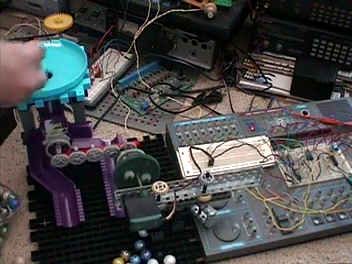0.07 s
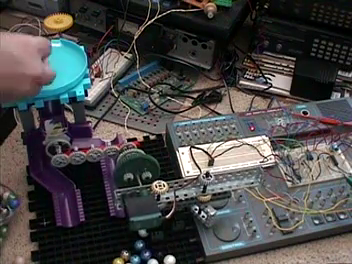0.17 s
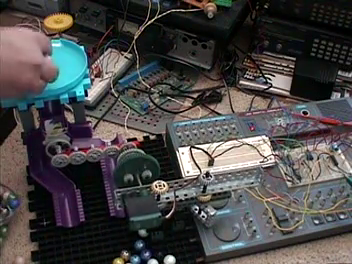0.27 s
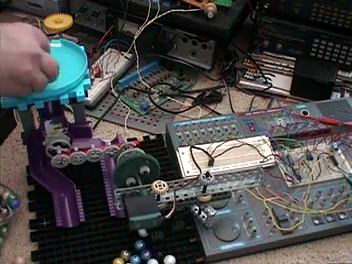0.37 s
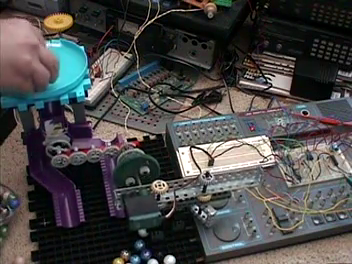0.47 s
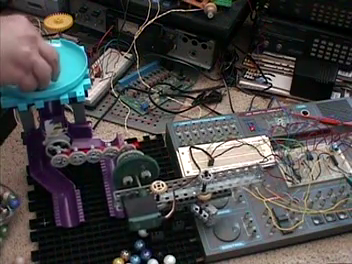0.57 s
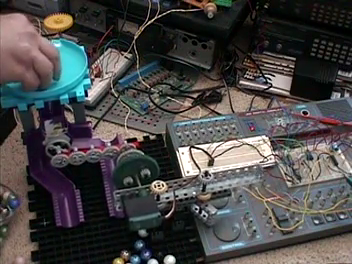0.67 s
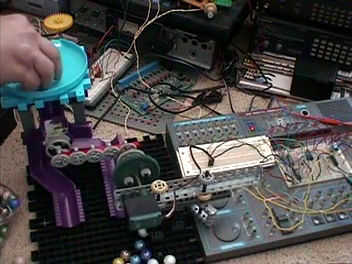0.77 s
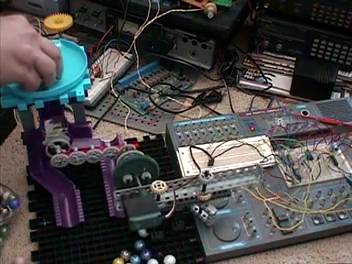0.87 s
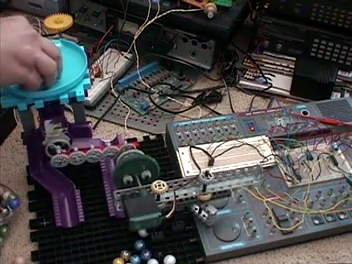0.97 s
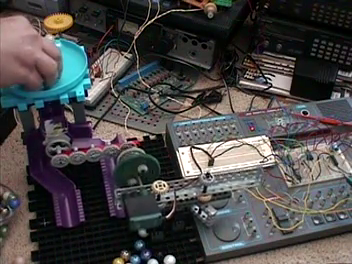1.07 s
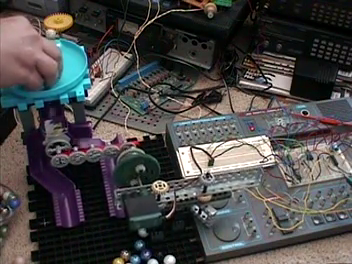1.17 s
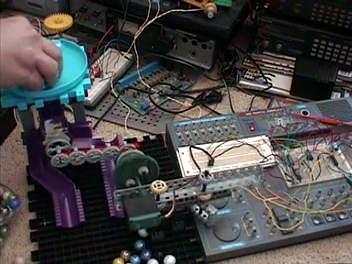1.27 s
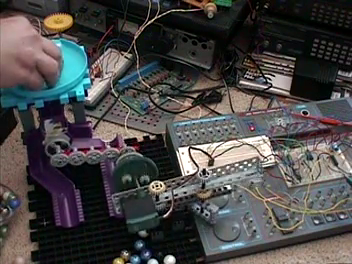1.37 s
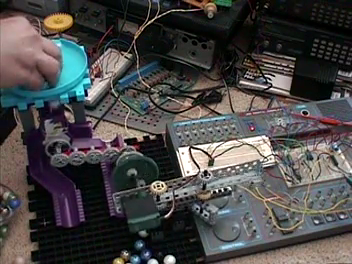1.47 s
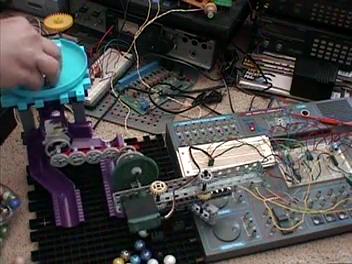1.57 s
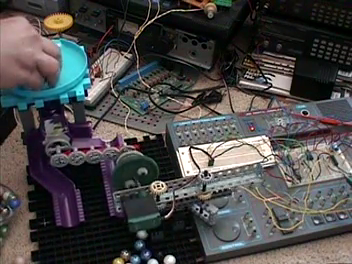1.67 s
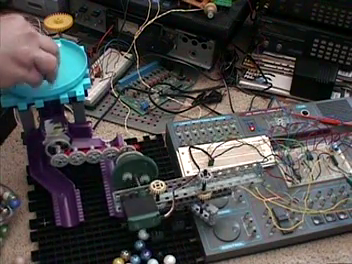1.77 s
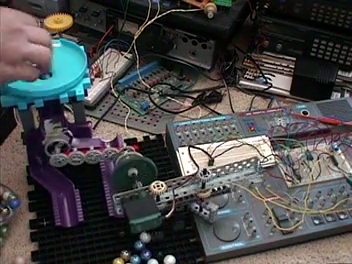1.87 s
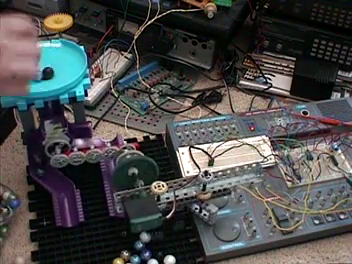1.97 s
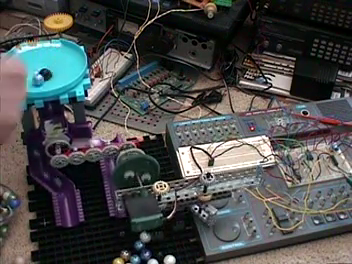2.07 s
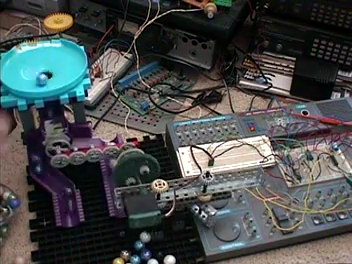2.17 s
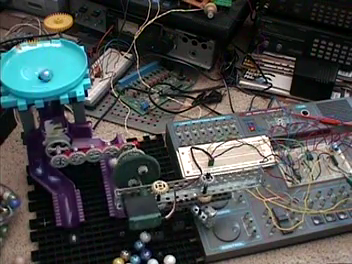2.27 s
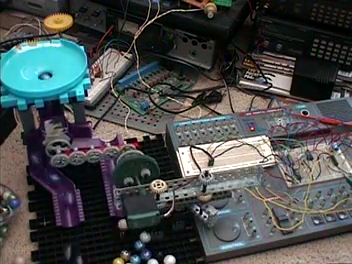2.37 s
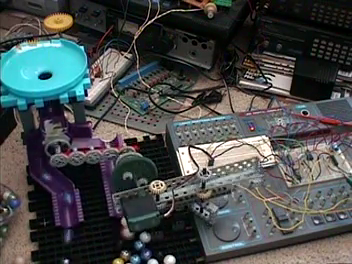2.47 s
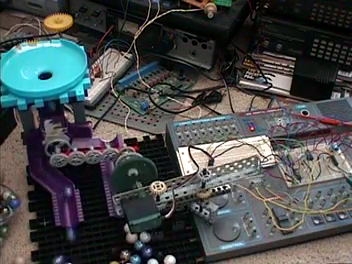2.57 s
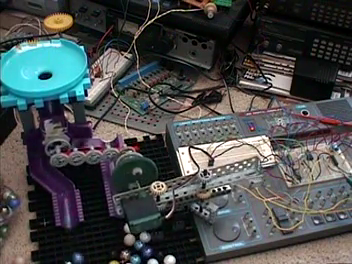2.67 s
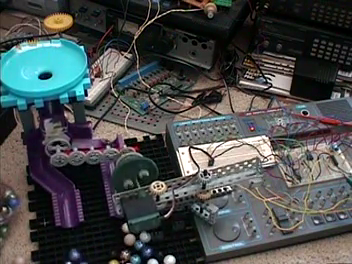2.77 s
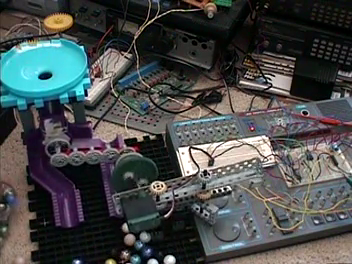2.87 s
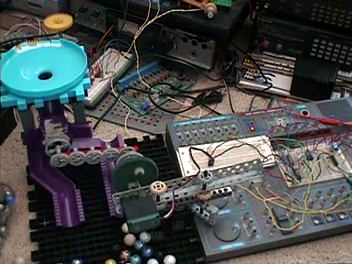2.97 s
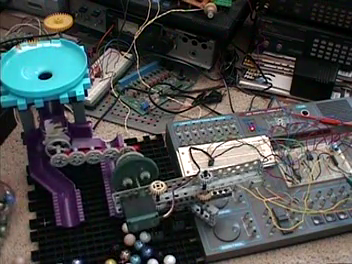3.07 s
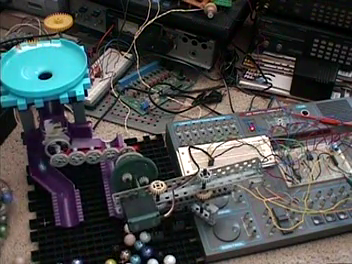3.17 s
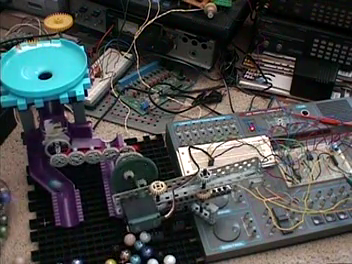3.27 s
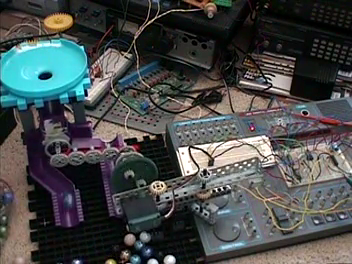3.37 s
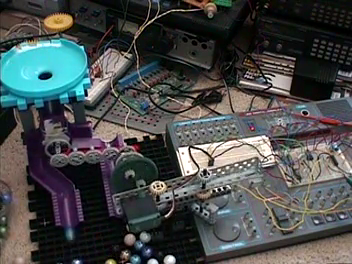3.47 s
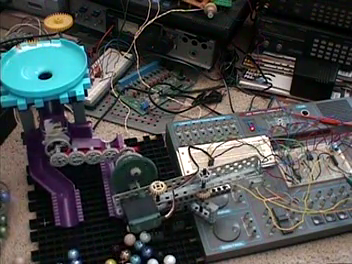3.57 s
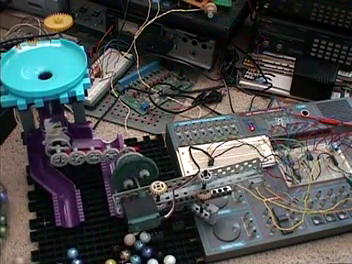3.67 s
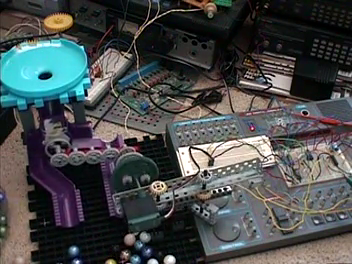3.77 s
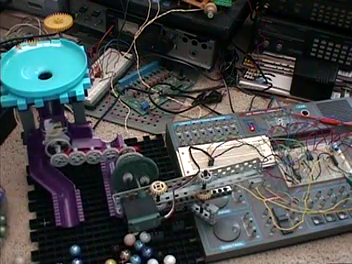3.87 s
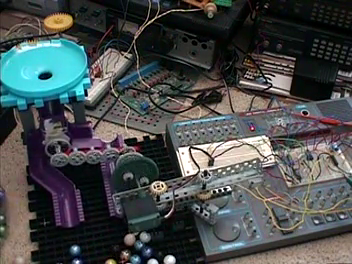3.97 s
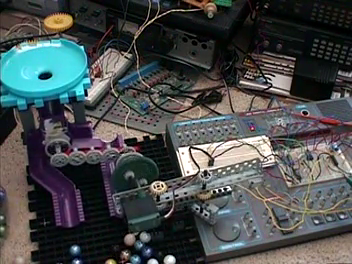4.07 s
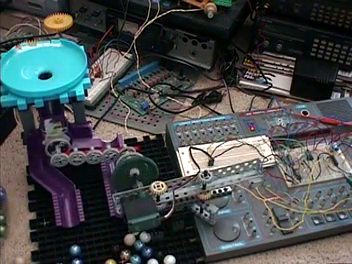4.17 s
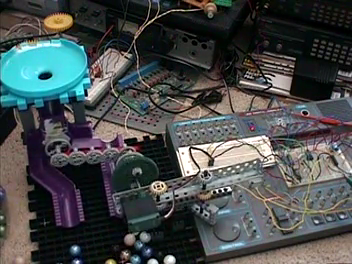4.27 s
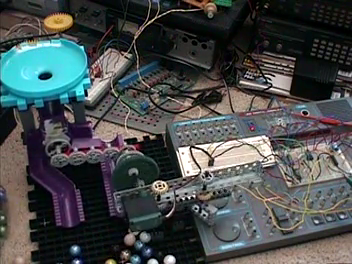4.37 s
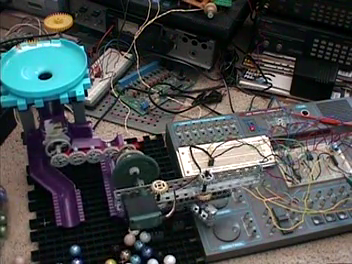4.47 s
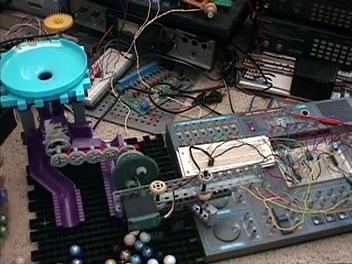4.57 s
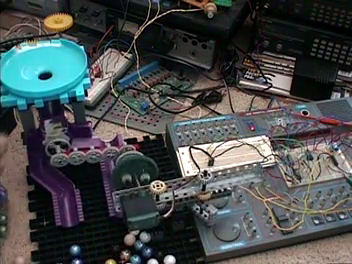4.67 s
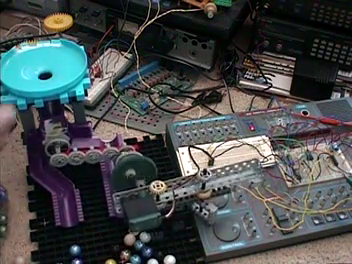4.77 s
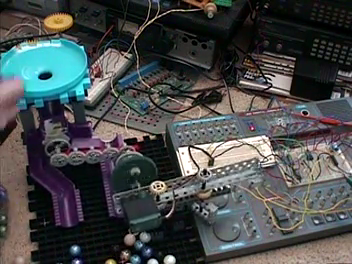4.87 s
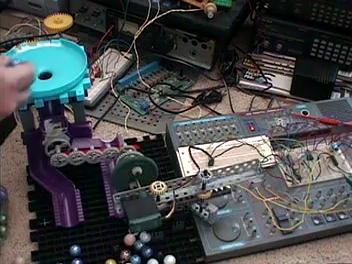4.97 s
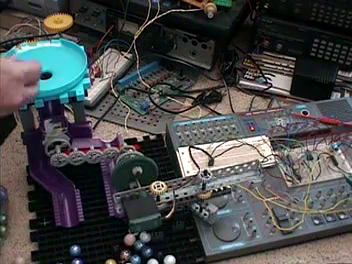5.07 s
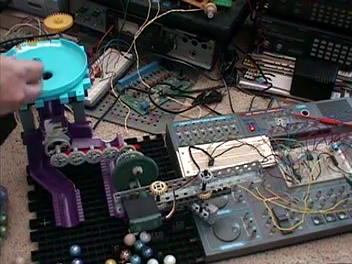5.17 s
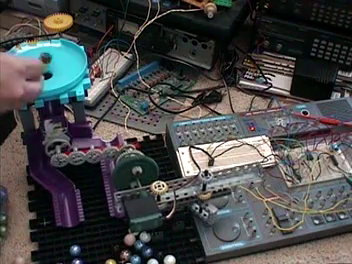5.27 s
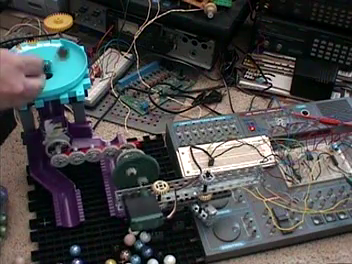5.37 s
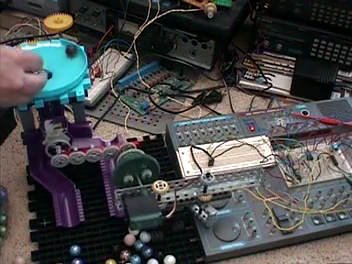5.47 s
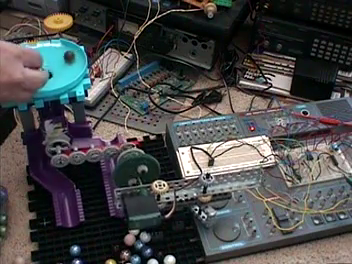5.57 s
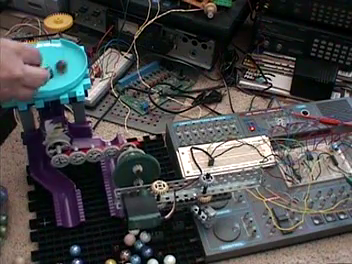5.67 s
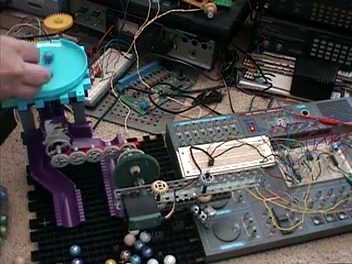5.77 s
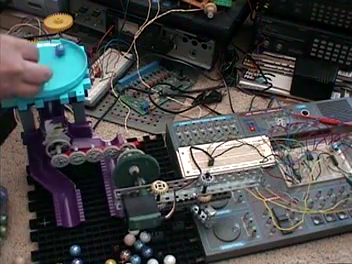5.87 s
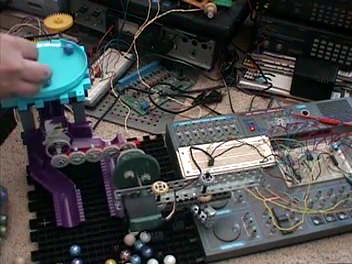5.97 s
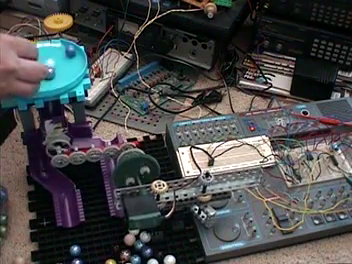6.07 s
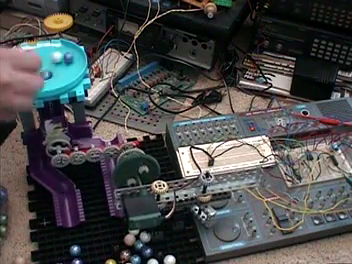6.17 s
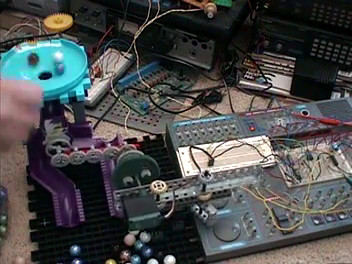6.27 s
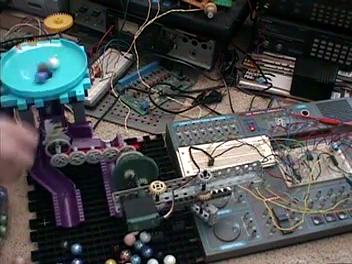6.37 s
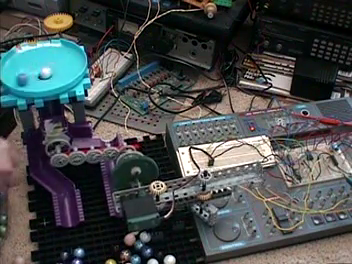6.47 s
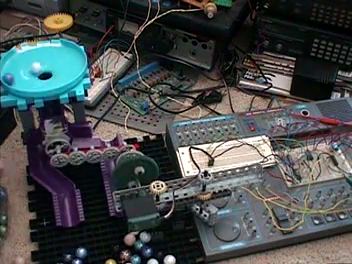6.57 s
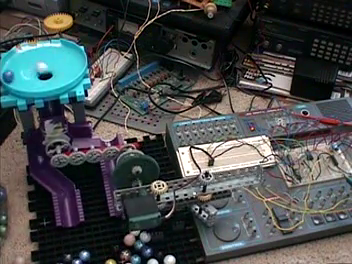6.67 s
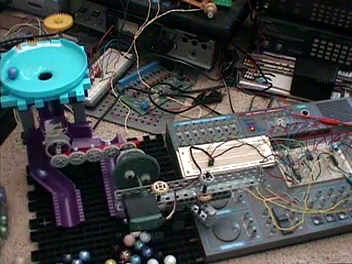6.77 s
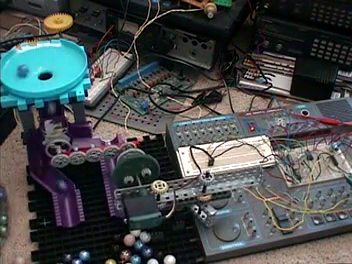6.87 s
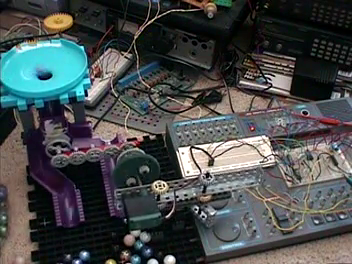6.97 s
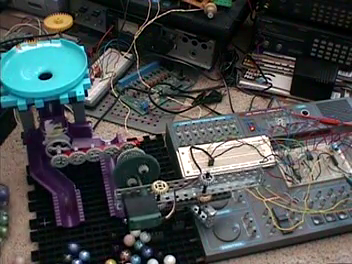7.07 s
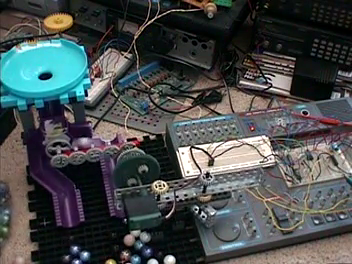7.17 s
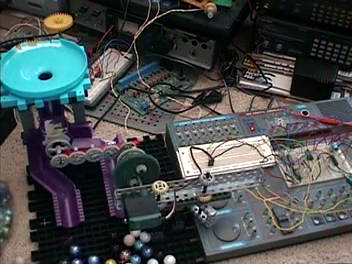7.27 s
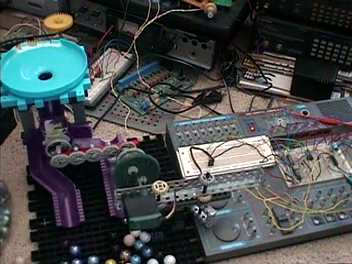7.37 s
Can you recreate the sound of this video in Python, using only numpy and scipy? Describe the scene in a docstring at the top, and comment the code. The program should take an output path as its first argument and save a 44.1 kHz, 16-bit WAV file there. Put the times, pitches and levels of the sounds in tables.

```python
"""Glass marbles knock and roll round a ringing plastic funnel, clatter down tracks and rumble over a base plate.
Under them a small gear motor whirs, dips when its gears bind and whines now and then, in a small room.
Knocks are short noise bursts sent through resonances; rolling is a dense patter of tiny impacts.
The motor is filtered noise with a wavering tone; the whines and a few soft slides are gliding sine tones."""
import sys
import numpy as np
from scipy import signal
from scipy.fft import rfft, irfft
from scipy.io import wavfile

SR = 44100
rng = np.random.default_rng(int(sys.argv[2]) if len(sys.argv) > 2 else 0)


def wav_out(sig):
    """Save sig, one row per channel (or a flat mono array), as 16-bit PCM at SR to the path in sys.argv[1]."""
    wavfile.write(sys.argv[1], SR, np.round(np.clip(np.atleast_2d(sig).T, -1, 1) * 32767).astype(np.int16))


N = 327222
TIME = np.arange(N) / SR  # seconds
EDGE_HZ = 12650  # top of the sound band
MOTOR_DB = -43  # whir of the freely running gears, before its flutter

# Levels in these tables are relative: the functions below trim and shape them further.
# Where the marbles are. Each row: time in seconds, share in the funnel from 0 to 1 (the rest is on the tracks).
FUNNEL_SHARE = [(.4, 0), (.55, 1), (1.82, 0.8), (1.9, 0), (5.2, 0.3), (5.28, 0.97), (6.14, 0.99),
                (6.25, 0.1), (6.9, 0.4), (7.05, 0.95), (7.13, 0)]
# Ringing notes of the funnel. Each row: pitch in Hz, width in Hz, level in dB.
FUNNEL_NOTES = [(213, 13, -27), (519, 26, -16), (846, 45, -16), (1124, 44, 0), (1210, 39, -4),
                (1316, 76, -6), (1560, 50, -11), (1936, 89, -7.5)]
# Ringing notes of the tracks. Each row: pitch in Hz, width in Hz, level in dB.
TRACK_NOTES = [(219, 9.5, 0), (318, 47, -11), (440, 110, -8), (832, 140, 8.5), (1065, 150, 9),
               (1244, 82, 5.5), (1444, 93, 10.5), (1930, 520, 7)]
# Ringing notes of the base plate. Each row: pitch in Hz, width in Hz, level in dB.
PLATE_NOTES = [(209, 7.4, -0.5), (239, 30, -0.5)]
# Colour of the thud of the base. Each row: frequency in Hz, level in dB per Hz.
THUD_COLOUR = [(70, -4.5), (150, -22), (220, -10), (290, -10), (520, 6.5), (700, 0), (1500, -11.5)]
# Colour of the bright clack. Each row: frequency in Hz, level in dB per Hz.
CLACK_COLOUR = [(300, -66.5), (800, -19), (1500, -4.5), (2100, 0), (2750, 2.5), (3400, 1.5), (4000, 2.5),
                (5300, -0.5), (6300, -4), (8500, -8.5), (12500, -19.5)]
# Colour of the motor whir. Each row: frequency in Hz, level in dB per Hz.
WHIR_COLOUR = [(200, -19.5), (800, -18), (2000, -22), (2700, -10.5), (3900, -10.5), (4500, -6), (4950, 2),
               (5400, 0), (6400, -9.5), (7000, -2.5), (7500, -7), (10700, -9.5), (12500, -14.5)]
# Colour of the quiet room. Each row: frequency in Hz, level in dB per Hz.
ROOM_COLOUR = [(190, 0), (280, 7), (700, -0.5), (12000, -49)]
# How long echoes last. Each row: frequency in Hz, time to fade by 60 dB in seconds.
ECHO_TIMES = [(150, 0.47), (12000, 0.16)]
# How alike left and right are. Each row: frequency in Hz, correlation (1 is identical).
SIDE_LIKENESS = [(60, 0.091), (1300, 0.91), (2800, 0.72), (6000, 0.041), (12000, 0.18)]
# How much louder left is. Each row: frequency in Hz, left minus right in dB.
SIDE_BALANCE = [(60, 1.5), (300, 7), (660, 3), (1200, 5.5), (2500, 2), (8000, 7), (12000, 0.5)]
# How far left runs ahead. Each row: frequency in Hz, lead in radians.
SIDE_LEAD = [(1500, 0.073), (3900, 0.68), (6600, 0.15)]
# The gears bind and pull free. Each row: quietest moment in seconds, sinking time in seconds,
# recovery time in seconds, depth of the dip in dB.
GEAR_STALLS = [(0.29, 0.14, 0.18, 15), (0.47, 0.059, 0.14, 11.5), (0.66, 0.051, 0.47, 4.5),
               (2.35, 0.12, 0.031, 25), (3.37, 0.21, 0.27, 14.5), (4.071, 0.29, 0.12, 22.5),
               (4.321, 0.14, 0.14, 13.5), (4.47, 0.065, 0.24, 8), (5.04, 0.13, 0.55, 17.5),
               (6.21, 0.037, 0.045, 28), (6.59, 0.053, 0.23, 19), (7.12, 0.12, 0.019, 25)]
# Two low hums and a squeak. Each row: start in seconds, length in seconds, first pitch in Hz,
# last pitch in Hz, level in dB.
SLIDING_TONES = [(0.031, 0.2, 114, 93, -62.5), (0.335, 0.037, 1190, 1850, -56.5),
                 (0.399, 0.5, 97.5, 83.7, -55.5)]
# A rolling marble bumps a wall or a neighbour. Each row: time in seconds, clack level in dB,
# level of the plastic's ring in dB.
MARBLE_BUMPS = [(0.126, -66, -44.5), (0.178, -53, -48), (0.282, -56, -51), (0.587, -30.5, -43),
                (0.718, -24, -26), (0.783, -35, -29.5), (0.8048, -27.5, -29), (0.914, -24, -30),
                (0.977, -28, -25.5), (1.016, -33, -26.5), (1.0847, -26.5, -34), (1.149, -29.5, -33.5),
                (1.1805, -40, -25), (1.1858, -26.5, -31), (1.245, -26.5, -23.5), (1.427, -23.5, -42),
                (1.707, -34, -28.5), (1.9125, -19.5, -30), (1.972, -24, -40), (2.005, -24.5, -40),
                (2.151, -31, -43), (2.281, -22.5, -34), (2.297, -29, -35), (2.314, -25, -40),
                (2.477, -23, -35), (2.6444, -30, -30.5), (2.7311, -25, -45), (2.751, -30, -27),
                (3.252, -29.5, -59), (3.275, -34, -29), (3.4531, -29, -37), (3.5252, -40, -32.5),
                (3.573, -39, -40), (3.602, -39, -33), (3.679, -40, -36.5), (3.8608, -51, -38.5),
                (3.897, -48, -39.5), (3.968, -48, -44.5), (4.0698, -70, -45.5), (4.43, -47, -41.5),
                (4.62, -66, -44.5), (4.9495, -44, -44), (5.133, -51, -48), (5.1505, -43, -49),
                (5.253, -21.5, -30.5), (5.34, -25.5, -24), (5.3598, -29, -33), (5.389, -30.5, -26.5),
                (5.4271, -35, -32), (5.452, -41, -34), (5.6336, -32, -29.5), (5.753, -28.5, -20.5),
                (5.765, -48, -33), (5.793, -23.5, -48), (5.85, -25, -26), (5.999, -23.5, -31),
                (6.0132, -27, -28), (6.085, -27, -21), (6.125, -30, -25), (6.4606, -31, -24),
                (6.708, -23, -29.5), (6.851, -22.5, -40), (6.9947, -25.5, -43.5), (7.058, -34.5, -30),
                (7.078, -34, -28.5), (7.1369, -27, -38), (7.228, -37, -30), (7.264, -29.5, -36)]
# A marble falls and lands. Each row: time in seconds, clack level in dB, brightness of the clack as a
# centre in Hz, note of the struck spot in Hz, level of the plastic's ring in dB.
MARBLE_DROPS = [(0.5421, -22.5, 3900, 3020, -38), (0.8892, -24.5, 4420, 2890, -25.5),
                (0.9302, -20, 3720, 4200, -24.5), (1.1266, -20.5, 3780, 2140, -23.5),
                (1.2246, -19.5, 3800, 1930, -24.5), (1.3506, -17.5, 3320, 3850, -23),
                (1.385, -17.5, 3370, 3750, -36), (1.5542, -17, 3580, 3760, -28.5),
                (1.5788, -19.5, 3380, 5430, -26), (1.7711, -15.5, 3480, 2120, -23),
                (1.8865, -16.5, 2800, 2470, -29.5), (1.9425, -19.5, 3380, 4100, -30),
                (1.989, -18, 3500, 6960, -27), (2.04, -17, 2900, 2460, -30.5),
                (2.1022, -18.5, 3400, 3930, -38), (2.1355, -18, 2970, 2900, -27.5),
                (2.1762, -17.5, 3020, 2530, -31), (2.2166, -19, 3420, 3070, -30),
                (2.2675, -20, 3280, 4260, -33), (2.3869, -15, 2770, 2430, -30),
                (2.4665, -21, 3170, 2620, -34.5), (2.5056, -20.5, 3270, 3920, -29.5),
                (2.685, -20.5, 4100, 5100, -24.5), (2.864, -19, 3470, 3830, -35),
                (3.1487, -19, 2870, 2520, -35), (3.1709, -17, 3300, 7560, -25.5),
                (5.184, -18.5, 3580, 5440, -30), (5.2822, -20.5, 3800, 2030, -22),
                (5.538, -20.5, 3700, 2800, -27), (5.6611, -16.5, 3720, 3240, -21.5),
                (5.905, -17, 3680, 3780, -24.5), (5.941, -16, 2830, 2530, -35),
                (6.2267, -21, 4160, 2930, -28), (6.2881, -18.5, 3500, 3840, -30),
                (6.3765, -17, 3070, 3330, -29), (6.5177, -17, 3200, 2010, -27.5),
                (6.6192, -15.5, 2630, 2520, -30.5), (6.6917, -19, 2580, 2940, -29.5),
                (6.8251, -15.5, 2900, 2520, -32), (6.8747, -19, 3000, 4200, -28),
                (7.1552, -21, 3220, 2880, -28), (7.2011, -19.5, 3930, 3300, -26.5),
                (7.3079, -23, 3020, 2300, -30), (7.3453, -17, 3470, 4000, -37)]
# Marbles circle in the funnel. Each row: start in seconds, length in seconds, level in dB.
FUNNEL_ROLLS = [(0.54, 0.2, -43), (0.72, 1.14, -37.5), (0.98, 0.057, -29.5), (5.29, 0.26, -43),
                (5.61, 0.57, -41), (7.045, 0.025, -33)]
# Marbles run down the tracks. Each row: start in seconds, length in seconds, level in dB.
TRACK_ROLLS = [(1.9, 0.61, -39.5), (2.42, 0.4, -38.5), (3.53, 0.053, -44.5), (4.44, 0.017, -47),
               (6.38, 0.031, -40.5), (6.76, 0.016, -40), (7.12, 0.12, -41)]
# Marbles leave the chute and roll over the ribbed base plate. Each row: start in seconds,
# length in seconds, level in dB.
PLATE_ROLLS = [(2.29, 0.53, -56), (3.52, 0.04, -56), (6.37, 0.07, -58.5), (7.08, 0.19, -59.5)]
# A cluster of marbles jostles. Each row: start in seconds, length in seconds, level in dB.
JOSTLING = [(0.9, 0.2, -31), (1.24, 0.23, -34), (1.68, 0.17, -32.5), (1.89, 0.41, -34),
            (2.45, 0.087, -35.5), (5.9, 0.25, -40.5), (6.42, 0.087, -47)]
# Gear whines. Each row: start in seconds, length in seconds, top pitch in Hz,
# sag at the ends as a share of the pitch, level in dB.
GEAR_WHINES = [(2.869, 0.18, 4930, .025, -38.5), (4.602, 0.096, 4890, .1, -35),
               (5.441, 0.042, 4700, .05, -33.5), (6.783, 0.069, 4900, 0.065, -35)]


def amp(db):
    """Turns decibels into a gain."""
    return 10 ** (np.asarray(db) / 20)


def read(points, hz):
    """Reads a table of frequencies and values on a log-frequency axis."""
    f, value = np.transpose(points)
    return np.interp(np.log(hz + 1), np.log(f + 1), value)


def curve(rows, t):
    """Reads a table of times and values at the times t."""
    return np.interp(t, *np.transpose(rows))


def add(mix, s, sound):
    """Mixes in a stereo sound at s seconds."""
    start = round(s * SR)
    part = mix[:, max(start, 0):max(start + sound.shape[1], 0)]
    part += sound[:, max(-start, 0):][:, :part.shape[1]]


def unit(x, size=None):
    """Scales a stereo pair so that the average of its sides has rms 1 over the first size samples."""
    middle = x.mean(0)[:size]
    return x / np.sqrt(np.mean(middle ** 2) + 1e-20)


def modes(table, hz):
    """Gain of a body's ringing notes, with an extra fall in the treble."""
    power = 0
    for f, width, db in table:
        detune = (hz ** 2 - f ** 2) / (width * hz + 1)
        power = power + amp(db) ** 2 / (1 + detune ** 2)
    return np.sqrt(power / (1 + (hz / 2700) ** 4) / power.max())


def causal(gain):
    """Gives this gain the timing of a body that rings only after it is struck."""
    cepstrum = irfft(np.log(np.maximum(gain, 1e-5)))
    half = len(cepstrum) // 2
    # folding the cepstrum onto positive times gives minimum phase
    return np.exp(rfft(np.r_[cepstrum[0], 2 * cepstrum[1:half], np.zeros(half)]))


def ports(hz):
    """Blends two unrelated signals into the microphone pair; the toy stands to the left."""
    same = np.clip(read(SIDE_LIKENESS, hz), 0, 1)
    common, apart = np.sqrt((1 + same) / 2), np.sqrt((1 - same) / 2)
    balance = read(SIDE_BALANCE, hz)
    left = amp(balance) * np.exp(1j * read(SIDE_LEAD, hz))
    return np.array([[common * left, apart * left], [common, -apart]]) / amp(balance / 2)


def radiate(drive, response, pair):
    """Sends two driving signals through one body to the two microphones."""
    heard = (pair * rfft(drive)).sum(1) * response
    return irfft(heard, drive.shape[1])


def grains(per_s, spread_db):
    """Sparse tiny impacts of very uneven size, at random moments."""
    size = amp(spread_db * np.minimum(rng.exponential(1, N), 4))
    hits = size * (rng.random(N) < per_s / SR)
    return unit(hits * rng.standard_normal((2, N)))


def flutter(rate_hz):
    """A random wobble: straight lines between random values of about unit size."""
    return np.interp(TIME * rate_hz, np.arange(4096), rng.standard_normal(4096))


def ripple(hz, spacing_hz):
    """Crowded plastic resonances: random peaks and dips along the spectrum, of about unit size."""
    return np.interp(hz / spacing_hz, np.arange(512), rng.standard_normal(512))


def strike(t, t60, contact, linger_db, linger_t60):
    """A hard first contact, then noise from waves scattering through the part and the rest of the toy."""
    # the t60 values are seconds for a fall of 60 dB
    decay = amp(-60 * t / t60) + amp(linger_db - 60 * t / linger_t60)
    scatter = rng.standard_normal((2, len(t))) * decay
    scatter[:, 0] += contact * np.array([1, rng.choice([-1, 1])])
    return scatter


def spells(rows, rise_s, fade_s):
    """Gain of overlapping spells: each builds up, holds and dies away exponentially."""
    power = np.zeros(N)
    for s, length, db in rows:
        rise = np.clip((TIME - s) / rise_s, 0, 1)
        fade = np.exp(-np.maximum(TIME - s - length, 0) / fade_s)
        power += (amp(db) * rise * fade) ** 2
    return np.sqrt(power)


def quiet_room(hz, pair, tone_db=-66):
    """The steady, faint hush of the room: noise strongest in the lows."""
    noise = rng.standard_normal((2, N))
    return amp(tone_db) * unit(radiate(noise, amp(read(ROOM_COLOUR, hz)), pair))


def load_db(slowing=0.95, recovering=2.67):
    """How many dB the motor sinks as the gears bind and pull free."""
    total = 0
    for s, slow_s, free_s, depth in GEAR_STALLS:
        sinking = np.clip(1 - (s - TIME) / slow_s, 0, 1) ** slowing * (TIME < s)
        freeing = np.clip(1 - (TIME - s) / free_s, 0, 1) ** recovering * (TIME >= s)
        total = total + depth * (sinking + freeing)
    return total


def motor(hz, pair, flutter_db=3.0, teeth=0.053, housing_db=2, right_db=2.0, mesh_hz=5050, waver=0.03,
          mesh_db=-15):
    """Little gears hiss in their housing round a faint wavering tooth tone, both quieter under load."""
    mesh = rng.standard_normal((2, N)) + teeth * grains(per_s=1100, spread_db=-1.5)
    housing = amp(read(WHIR_COLOUR, hz) + housing_db * ripple(hz, spacing_hz=106.8))
    whir = unit(radiate(mesh, housing, pair) * amp([[0], [right_db]]))
    turn = 2 * np.pi * np.cumsum(mesh_hz * (1 + waver * flutter(rate_hz=28))) / SR
    tone = amp(mesh_db) * flutter(rate_hz=70) * np.array([np.sin(turn + 1), np.sin(turn)])
    return (whir + tone) * amp(MOTOR_DB - load_db() + flutter_db * flutter(rate_hz=44))


def slides(right_db=-5.0):
    """Soft pure tones that swell and fade while their pitch glides."""
    out = np.zeros((2, N))
    for s, length, start_hz, end_hz, db in SLIDING_TONES:
        u = np.linspace(0, 1, int(length * SR))
        pitch = end_hz + (start_hz - end_hz) * (1 - u) ** 1.3
        swell = np.sqrt(2 * abs(np.sin(np.pi * u)))
        tone = amp(db) * swell * np.sin(2 * np.pi * np.cumsum(pitch) / SR)
        add(out, s, tone * amp([[2], [-0.5 + right_db]]))
    return out


def rebound(sound, after_s=0.016, db=-15, spread_db=5):
    """The marble hops and lands once more, softer, after half to one and a half times after_s."""
    delay = int(after_s * (.5 + rng.random()) * SR)
    size = amp(db + spread_db * (2 * rng.random() - 1.0))
    return sound + size * np.pad(sound, ((0, 0), (delay, 0)))[:, :sound.shape[1]]


def blows(clack_db=-3.0, ring_db=-1, thud_db=-15, tilt=2.9, centre_hz=3600, note_db=1.5,
          note_width_hz=190, ripple_db=2.0, bump_thud_db=-21, size=8192):
    """Each blow is a bright clack, a ring of the funnel or track, and a thud of the base."""
    t, hz, out = np.arange(size) / SR, np.fft.rfftfreq(size, 1 / SR), np.zeros((2, N))
    pair, funnel, track = ports(hz), modes(FUNNEL_NOTES, hz), modes(TRACK_NOTES, hz)
    base = causal(amp(read(THUD_COLOUR, hz)))
    fade = np.minimum(1, (t[-1] - t) / t[-1] * 2) ** 2
    events = [(*row, thud_db) for row in MARBLE_DROPS]
    # a sideways bump hardly shakes the base, and its note is random
    for s, clack_level, ring_level in MARBLE_BUMPS:
        note_hz = centre_hz * 2 ** (rng.random() - .5)
        events.append((s, clack_level, centre_hz, note_hz, ring_level, bump_thud_db))
    for s, clack_level, clack_hz, note_hz, ring_level, shake_db in events:
        share = np.clip(curve(FUNNEL_SHARE, s), 0, 1)
        body = causal(np.sqrt(share * funnel ** 2 + (1 - share) * track ** 2 / 2))
        # a shorter contact tips the clack towards the treble
        hardness = (np.clip(hz, 2200, 8000) / centre_hz) ** (tilt * np.log2(clack_hz / centre_hz))
        # every spot has its own colour and one lifted note
        note = 1 + amp(note_db) / (1 + ((hz - note_hz) / note_width_hz) ** 2)
        spot = amp(ripple_db * ripple(hz, spacing_hz=128.84)) * note
        surface = causal(amp(read(CLACK_COLOUR, hz)) * hardness * spot)
        clack_hit = strike(t, t60=0.026, contact=2.66, linger_db=-9.5, linger_t60=0.046)
        ring_hit = strike(t, t60=0.056, contact=29.7, linger_db=-10.5, linger_t60=0.15)
        thud_hit = strike(t, t60=0.026, contact=4.4, linger_db=-15.0, linger_t60=0.2)
        blow = amp(clack_level + clack_db) * unit(radiate(clack_hit, surface, pair), size=440)
        blow += amp(ring_level + ring_db) * unit(radiate(ring_hit, body, pair), size=440)
        blow += amp(ring_level + shake_db) * unit(radiate(thud_hit, base, pair), size=440)
        add(out, s, fade * rebound(blow))
    return out


def room(x, first_s=.007, shared_hz=1500):
    """Echo of a cluttered small room: dense weak reflections, treble dying first, bass alike on both sides."""
    t = TIME[:SR // 2]
    taps = rng.standard_normal((2, len(t))) * (rng.random((2, len(t))) < .08) * (t > first_s)
    hz, at, z = signal.stft(taps, SR, nperseg=256)
    same = 1 / (1 + (hz[:, None] / shared_hz) ** 2)
    z = np.array([z[0], same * z[0] + np.sqrt(1 - same ** 2) * z[1]])
    decay = amp(-60 * at / read(ECHO_TIMES, hz)[:, None])
    tail = signal.istft(z * decay, SR, nperseg=256)[1]
    return signal.fftconvolve(x, tail / np.linalg.norm(tail[0]), axes=1)[:, :N]


def stirred(db=-21, settle_s=0.1):
    """Gain of the rattle that each landing marble stirs up among its neighbours."""
    rows = [(s, 0, clack_level + db) for s, clack_level, *_ in MARBLE_DROPS]
    return spells(rows, rise_s=0.048, fade_s=settle_s)


def rattle(hz, pair, ripple_db=3.5, count=10):
    """Jostling marbles tick against several spots of the plastic, each with its own colour."""
    t, out = TIME[:2048], np.zeros((2, N))
    for _ in range(count):
        tick = strike(t, t60=0.026, contact=5.7, linger_db=-9, linger_t60=0.05)
        ticks = signal.oaconvolve(grains(per_s=22, spread_db=2.5), tick, axes=1)[:, :N]
        spot = causal(amp(read(CLACK_COLOUR, hz) + ripple_db * ripple(hz, spacing_hz=268.0)))
        out += radiate(ticks, spot, pair)
    return unit(out)


def rolling(hz, pair, funnel_db=0, track_db=-1, plate_db=1.0, rattle_db=-1):
    """Rolling marbles patter densely on funnel, tracks and base plate, and jostle each other."""
    # circling marbles press on the funnel unevenly, so the patter comes in lumps
    patter = grains(per_s=1200, spread_db=2.5) * amp(5 * np.tanh(flutter(rate_hz=50)))
    funnel = unit(radiate(patter, causal(modes(FUNNEL_NOTES, hz)), pair))
    # the marble's weight on the track favours the lowest notes
    weight = amp(6 / (1 + (hz / 600) ** 4))
    track_body = causal(weight * modes(TRACK_NOTES, hz))
    track = unit(radiate(grains(per_s=600, spread_db=3.5), track_body, pair))
    plate = unit(radiate(grains(per_s=800, spread_db=2), causal(modes(PLATE_NOTES, hz)), pair))
    jostle_gain = np.hypot(spells(JOSTLING, rise_s=0.0062, fade_s=0.031), stirred())
    return (amp(funnel_db) * spells(FUNNEL_ROLLS, rise_s=0.012, fade_s=0.019) * funnel
            + amp(track_db) * spells(TRACK_ROLLS, rise_s=0.0043, fade_s=0.18) * track
            + amp(plate_db) * spells(PLATE_ROLLS, rise_s=.012, fade_s=0.13) * plate
            + amp(rattle_db) * jostle_gain * rattle(hz, pair))


def whines(right_db=-3):
    """Gear whines: unsteady sine tones whose pitch and loudness rise and fall in an arch."""
    out = np.zeros((2, N))
    for s, length, top_hz, sag, db in GEAR_WHINES:
        u = np.linspace(-1, 1, int(length * SR))
        pitch = top_hz * (1 - sag * u ** 2 + .011 * flutter(rate_hz=400)[:len(u)])
        level = amp(db + 2 * flutter(rate_hz=150)[:len(u)]) * (1 - u ** 2)
        turn = 2 * np.pi * np.cumsum(pitch) / SR
        add(out, s, level * np.array([np.sin(turn + 1), amp(right_db) * np.sin(turn)]))
    return out


def scene(room_db=-10):
    """Marbles with their echo, the motor with its whines, the soft slides and the quiet of the room."""
    hz = np.fft.rfftfreq(N, 1 / SR)
    pair = ports(hz)
    marbles = blows() + rolling(hz, pair)
    echo = amp(room_db) * room(marbles)
    return quiet_room(hz, pair) + motor(hz, pair) + slides() + marbles + echo + whines()


def record(dry, top=0.36, bottom=0.52, knee=3, low_cut_hz=8):
    """The microphone overloads sooner upwards than downwards, so the hardest clacks thump; then the band limits."""
    ceiling = np.where(dry > 0, top, bottom)
    rounded = dry / (1 + abs(dry / ceiling) ** knee) ** (1 / knee)
    low_cut = signal.butter(1, low_cut_hz, "high", fs=SR, output="sos")
    rounded = signal.sosfilt(low_cut, rounded)
    low_pass = signal.firwin(301, EDGE_HZ, window=("kaiser", 8), fs=SR)
    return signal.oaconvolve(rounded, low_pass[None], "same", axes=1)


dry = scene()
out = record(dry)
wav_out(out)
```